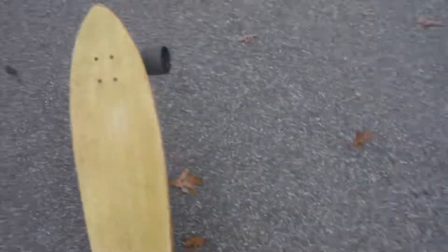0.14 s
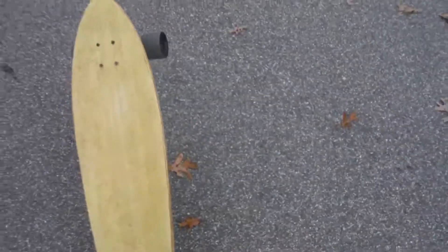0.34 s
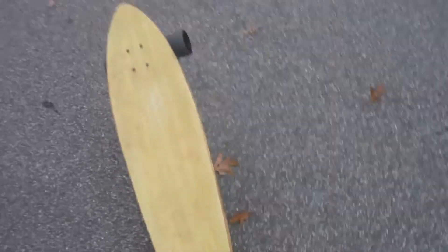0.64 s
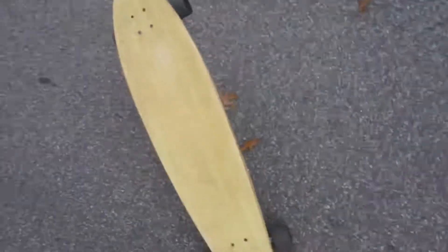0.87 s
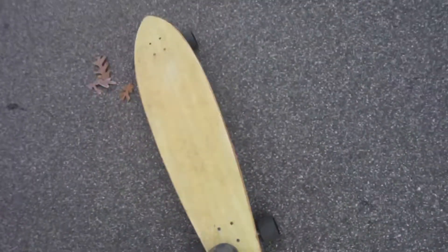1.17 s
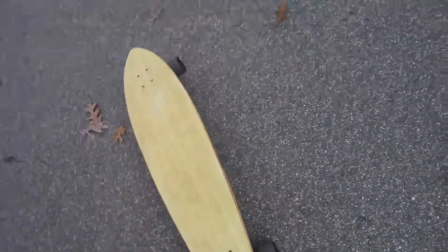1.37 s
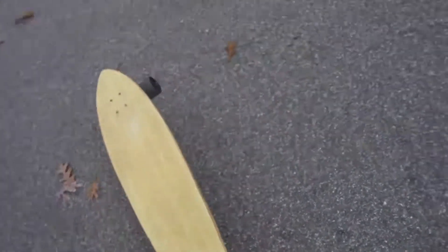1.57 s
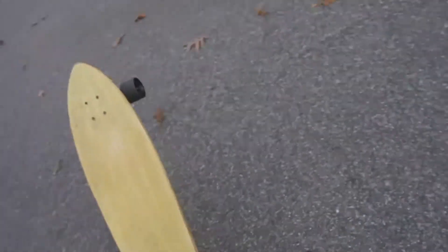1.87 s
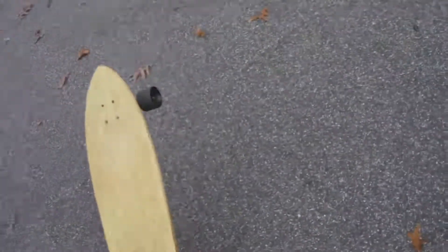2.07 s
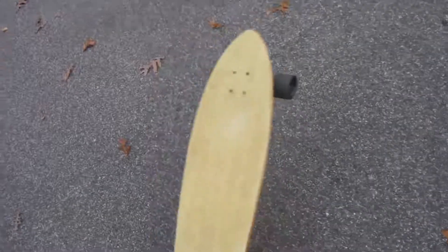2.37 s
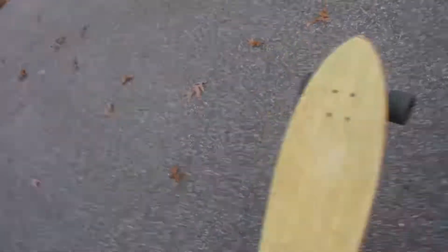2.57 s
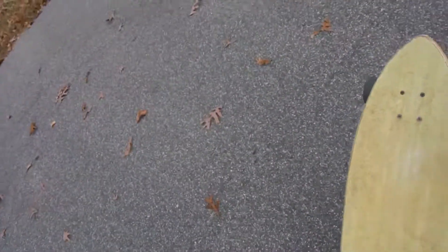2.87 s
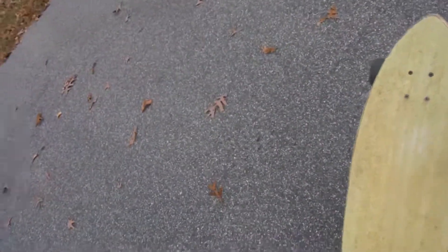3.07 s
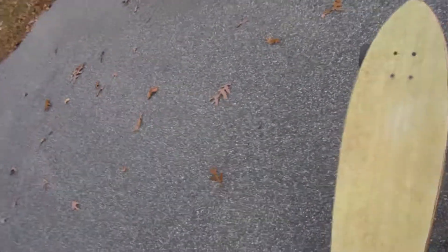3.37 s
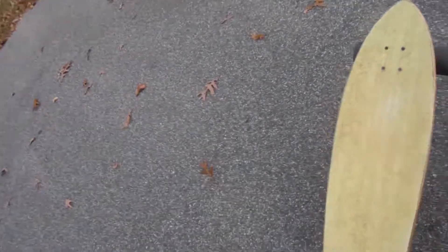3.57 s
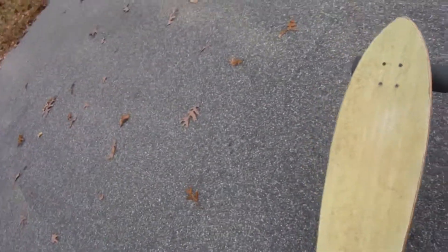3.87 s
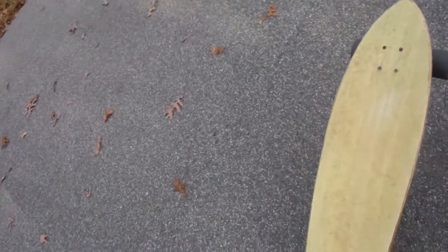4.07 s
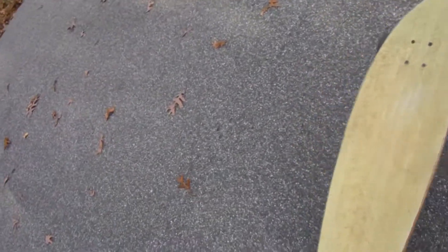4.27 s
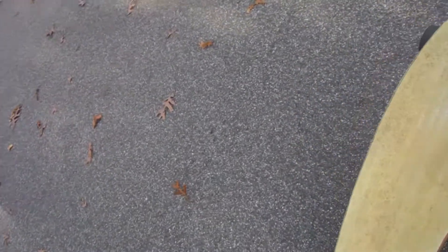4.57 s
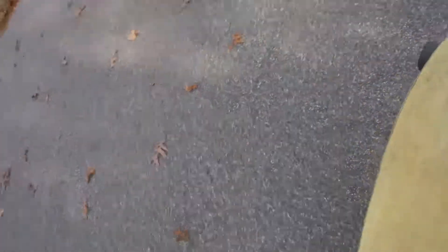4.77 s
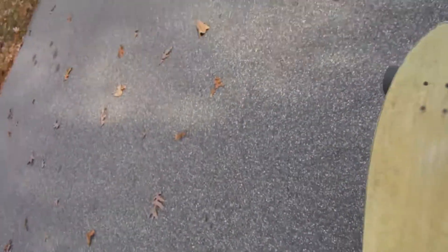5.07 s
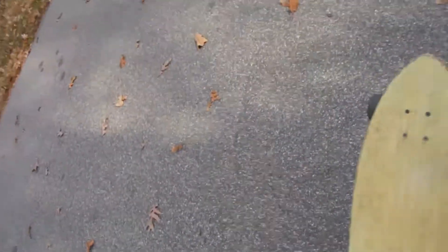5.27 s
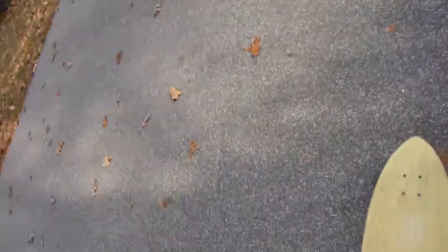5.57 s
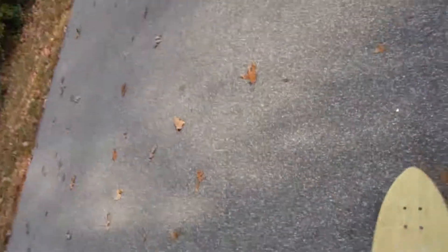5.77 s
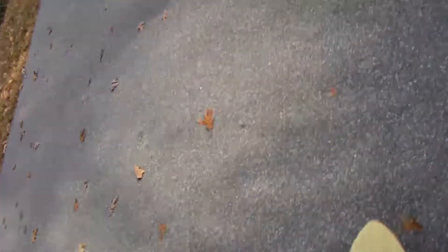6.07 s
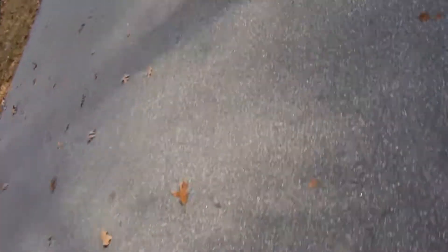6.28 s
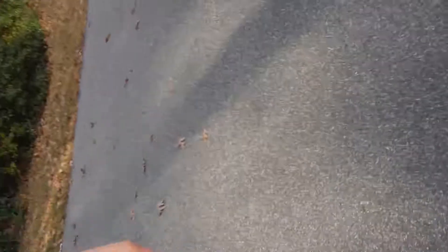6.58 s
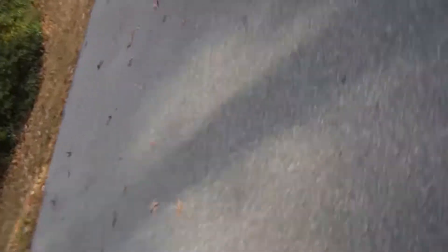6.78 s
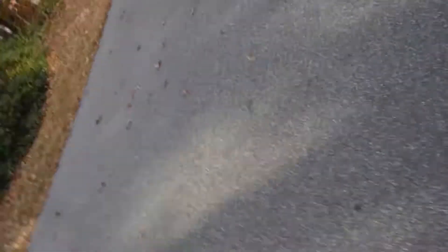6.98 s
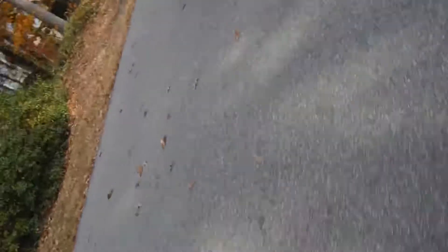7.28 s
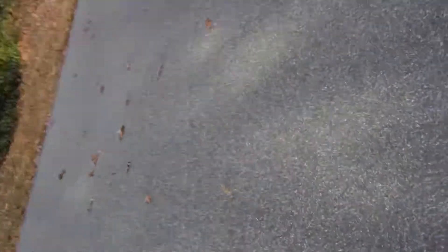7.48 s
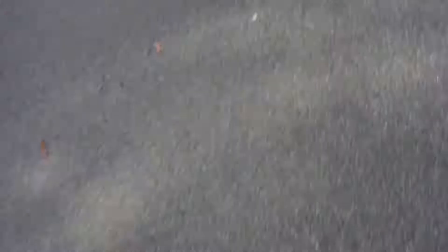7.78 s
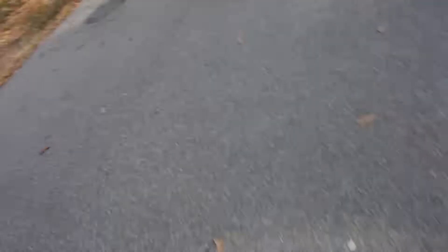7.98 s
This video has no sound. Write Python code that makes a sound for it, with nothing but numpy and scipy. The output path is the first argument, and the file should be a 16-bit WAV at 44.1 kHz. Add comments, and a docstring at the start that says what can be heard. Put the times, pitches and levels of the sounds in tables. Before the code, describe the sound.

A wooden longboard knocks and scrapes on asphalt, drops with a loud clack, then rolls away with a rising rumble.

```python
"""A wooden longboard is dropped, nudged and dragged on asphalt, then rolls away.
Each knock rings its deck (the wooden plank); stones make the wheels rumble, bearings and gravel hiss.
Shoes or sleeves scuff, small things tick, and fingers tap a hand-held camera whose lens motor chirps
over a quiet street. The loudest knocks overload the camera's sound and briefly turn its level down."""
import sys
import numpy as np
from scipy import signal
from scipy.io import wavfile
from scipy.ndimage import uniform_filter1d

SR = 44100
rng = np.random.default_rng(int(sys.argv[2]) if len(sys.argv) > 2 else 0)


def waveform_to_disk(signal):
    """Save audio, clipped to [-1, 1], as 16-bit WAV at the path in sys.argv[1]."""
    frames = np.transpose(np.atleast_2d(signal))
    scaled = np.clip(frames, -1, 1) * 32767
    samples = np.round(scaled).astype(np.int16)
    wavfile.write(sys.argv[1], SR, samples)


N = 358533

# The notes of the deck: (pitch [Hz], relative level [dB], time to fade 60 dB when nothing damps it [s])
DECK_NOTES = [(134, -15, 0.019), (179, -13, 0.044), (256.5, -8, 0.054), (327, -6, 0.017),
              (441, -5.5, 0.027), (487, -5, 0.074), (553, -7, 0.044), (621.8, -1.5, 0.14),
              (685, -5.5, 0.079), (734, -5, 0.056), (823, -2.5, 0.091), (924, -4, 0.065), (1040, -3, 0.05),
              (1160, -1.5, 0.023), (1390, -6, 0.041), (1608, -6.5, 0.041), (1920, 0, 0.022),
              (2210, -10, 0.036), (2428, -15, 0.022), (2900, -28, 0.028)]
# Tone of crushed grit, with the microphone's peak near 7.5 kHz: (frequency [Hz], relative level [dB])
GRIT_TONE = [(1290, -35.5), (2200, 4.5), (2370, -5.5), (2820, -1), (3620, -7), (3900, -4), (6160, -6),
             (7390, -2.5), (8510, -7.5), (10100, -20.5), (13000, -28.5), (16000, -47)]
# The board rolls: (time [s], rumble [dB], how strongly the deck rings [score], hiss against rumble [dB])
ROLL_PATH = [(6.06, -61, 8, 1), (6.09, -47.5, -9.5, -5), (6.26, -38.5, 11.5, 5), (6.42, -29.5, -7, -9.5),
             (6.42, -35, -2, -5.5), (6.55, -37, -11, -1.5), (6.68, -28.5, -2.5, -8),
             (6.84, -31, 10.5, -1.5), (6.95, -27, -2.5, -3.5), (7.07, -28, -7.5, -6.5),
             (7.26, -25.5, 5, -1.5), (7.3, -27.5, -1.5, -7.5), (7.33, -33, 12.5, 1.5),
             (7.38, -24.5, 3, -6.5), (7.39, -25.5, 4.5, 5), (7.43, -28, 0.5, -4), (7.49, -21, -7, -9),
             (7.67, -32, -9.5, -6.5), (7.85, -18, -7, -11), (7.88, -23, 3, -5), (8.02, -22, 5.5, -6.5),
             (8.05, -15.5, -8, -11.5), (8.08, -20.5, 1.5, -6.5), (8.13, -22.5, -4, -8.5)]


def gain_of(db):
    """Turns decibels into a number to multiply by."""
    return 10 ** (np.asarray(db) / 20)


def evened(x):
    """Scales a signal to an average power of 1."""
    return x / np.sqrt(np.mean(x ** 2) + 1e-20)


def add(mix, start, sound):
    """Mixes a sound in at a time in seconds."""
    part = mix[max(round(start * SR), 0):][:len(sound)]
    part += sound[:len(part)]


def coloured(x, tone):
    """Filters a sound to a tone curve of (Hz, dB) points; the result has power 1."""
    points_hz, db = np.transpose(tone)
    hz = abs(np.fft.fftfreq(8192, 1 / SR))
    log_gain = np.interp(np.log(hz + 1), np.log(points_hz + 1), np.maximum(db, -100)) * np.log(10) / 20
    response = np.exp(np.conj(signal.hilbert(log_gain)))  # rings after a hit, never before it
    impulse = np.fft.ifft(response).real[:4096]
    return evened(signal.oaconvolve(x, impulse)[:len(x)])


def curve(times, db):
    """A gain that glides through levels at given times and is silent outside them."""
    return gain_of(np.interp(np.arange(N) / SR, times, db, -200, -200))


def strokes(rows, rise_s, fall_db_per_s):
    """A gain made of strokes (start, hold, dB) that each rise, hold and die away."""
    out = np.zeros(N)
    for start, hold, db in rows:
        t = np.arange(0, hold + 60 / fall_db_per_s, 1 / SR)
        fading = gain_of(db - fall_db_per_s * np.maximum(t - hold, 0))
        add(out, start, np.minimum(t / rise_s, 1) * fading)
    return out


def ring(notes, length, shares):
    """A struck object's fading notes (t60: seconds to fade 60 dB); shares vary their size and sign."""
    t = np.arange(round(length * SR)) / SR
    parts = (np.sign(share) * gain_of(db - 60 * t / t60) * (0.77 + abs(share)) * np.sin(2 * np.pi * hz * t)
             for (hz, db, t60), share in zip(notes, shares))
    return sum(parts) * (1 - np.exp(-t / 0.0001))


def resonate(x, hz, width_hz):
    """Keeps the part of a sound near one pitch, which may move; the result has power 1."""
    turn = np.exp(2j * np.pi * np.cumsum(hz * np.ones(len(x))) / SR)
    decay = np.exp(-np.pi * width_hz / SR)
    smoothed = signal.lfilter([1], np.convolve([1, -decay], [1, -decay]), x / turn)
    return evened((turn * smoothed).real)


def wavering(hz, width_hz):
    """A tone whose pitch and level wander at random; it has power 1."""
    decay = np.exp(-np.pi * width_hz / SR)
    drift = signal.lfilter([1 - decay], [1, -decay], rng.standard_normal(N) + 1j * rng.standard_normal(N))
    return evened((drift * np.exp(2j * np.pi * hz * np.arange(N) / SR)).real)


def bumps(per_s, spread_db):
    """Tiny kicks at random times, like stones in asphalt; a few are large."""
    size = gain_of(spread_db * np.minimum(rng.exponential(1, N), 4)) * rng.choice([-1., 1.], N)
    return size * (rng.random(N) < per_s / SR)


def shaking(per_s, spread_db, t60, rise_s):
    """A restless gain: each jolt of the axles sets off a short swell."""
    jolts = abs(bumps(per_s, spread_db))
    fall, rise = gain_of(-60 / (t60 * SR)), np.exp(-1 / (rise_s * SR))
    swells = signal.lfilter([1], np.convolve([1, -fall], [1, -rise]), jolts)
    return evened(0.96 + evened(swells))


def street():
    """A distant wash of noise with drifting patches, two hums and a thin whine that comes and goes."""
    # Tone of the wash: (frequency [Hz], relative level [dB])
    wash_tone = [(13, -67), (22, -13.5), (101, -5.5), (157, -17.5), (232, -16), (450, -20), (926, -17.5),
                 (1290, -22), (2250, -21), (2730, -23), (4880, -23.5), (5300, -26), (6200, -28),
                 (7800, -25.5), (10500, -38), (15200, -43), (16500, -21.5)]
    # Hums that never stop: (pitch [Hz], width of the wavering [Hz], level [dB])
    hum_notes = [(114, 29, -46), (2110, 1.6, -62.5)]
    # Loudness of the whine: (time [s], level [dB])
    whine_levels = [(.75, -57), (.9, -57), (1.54, -66), (1.57, -50), (1.7, -52), (1.74, -59), (3.12, -58),
                    (3.17, -53), (3.28, -52), (3.33, -66), (3.56, -63), (3.62, -51), (3.92, -56),
                    (4.0, -60), (4.6, -60), (5.5, -70)]
    _, _, spectrum = signal.stft(coloured(rng.standard_normal(N), wash_tone), nperseg=1024)
    speckle = rng.standard_normal(spectrum.shape)
    patches = evened(uniform_filter1d(uniform_filter1d(speckle, 14, 0), 8, 1))  # blur in pitch and time
    wash = evened(signal.istft(spectrum * gain_of(0.62 * patches), nperseg=1024)[1][:N])
    hums = sum(gain_of(db) * wavering(hz, width) for hz, width, db in hum_notes)
    whine = curve(*np.transpose(whine_levels)) * wavering(2313, width_hz=15)
    return gain_of(-40.5) * wash + hums + whine


def tick(hz, width_hz, t60, snap_db):
    """One tiny burst of noise around a pitch, with a bright snap at the microphone's peak."""
    t = np.arange(round(.04 * SR)) / SR
    burst = rng.standard_normal(len(t)) * gain_of(-60 * t / t60) * (1 - np.exp(-t / 0.00025))
    sound = resonate(burst, hz, width_hz) + gain_of(snap_db) * resonate(burst, 7600, width_hz=2200)
    sound = signal.sosfilt(signal.butter(2, [150, 10500], 'band', fs=SR, output='sos'), sound)
    return sound / abs(sound).max()


def camera_taps():
    """Fingers tap the camera body with dull little knocks."""
    # Taps: (time [s], peak level [dB], centre pitch [Hz])
    taps = [(.015, -13.5, 155), (.354, -29.5, 151), (0.471, -27.5, 194), (.697, -19.5, 700),
            (6.107, -22, 458)]
    out = np.zeros(N)
    for start, db, hz in taps:
        add(out, start, gain_of(db) * tick(hz, width_hz=940, t60=0.0065, snap_db=-21))
    return out


def dry_ticks():
    """Pebbles, leaves and fingers make short, dry ticks."""
    # Ticks: (time [s], peak level [dB], centre pitch [Hz], snap against the tick's body [dB])
    ticks = [(.0553, -18.5, 1460, -9), (0.0666, -17.5, 4500, -1), (0.207, 3.5, 3180, -5.5),
             (0.26, -9.5, 4450, -9), (.4753, -20, 4150, 3), (.5684, -23, 4500, 3), (6.349, 0, 3780, -12),
             (6.404, -7, 1560, -16), (6.427, -5, 3170, -22), (6.459, -27, 1800, -16),
             (6.6255, -22, 2310, -14), (6.757, -11.5, 1910, 2), (6.8052, -13.5, 1480, -7),
             (6.988, -3.5, 1680, -12), (7.0411, -10, 3020, -20), (7.105, -10.5, 1940, -24),
             (7.2065, -16, 1500, -3), (7.2683, -6.5, 1630, -5), (7.3194, -12, 1760, -12),
             (7.388, -7, 5820, -10), (7.5501, -7, 2980, -17), (7.558, -12.5, 3540, -21),
             (7.7114, -20.5, 3050, -6), (7.742, -1, 1900, -15), (7.9744, -7, 1360, -17)]
    out = np.zeros(N)
    for start, db, hz, snap_db in ticks:
        add(out, start, gain_of(db) * tick(hz, width_hz=2660, t60=0.0071, snap_db=snap_db))
    return out


def scuffs():
    """A shoe or sleeve rubs briefly and makes a grainy noise."""
    # Rubs: (start [s], hold [s], level [dB])
    rubs = [(0.058, 0.013, -36.5), (.468, 0.022, -30.5), (6.034, 0.013, -28)]
    # Tone of the rubbing: (frequency [Hz], relative level [dB])
    rub_tone = [(120, -47), (200, 0), (1570, -0.5), (1880, -2.5), (3120, 1), (5550, -1), (7020, 5),
                (8570, -0.5), (11900, -33), (15000, -29)]
    friction = rng.standard_normal(N) + .5 * evened(bumps(per_s=640, spread_db=2))
    return coloured(friction, rub_tone) * strokes(rubs, rise_s=0.0048, fall_db_per_s=830)


def lens_motor():
    """A small motor whistles in steps; its gear clicks at its stops and when it starts after a rest."""
    # The motor runs: (start [s], length [s])
    runs = [(0.458, .008), (.498, .022), (1.08, 0.048), (1.371, .008), (1.496, 0.055), (1.97, 0.037),
            (2.062, .01), (2.08, .01), (2.126, .01), (2.192, .01), (2.216, .01), (2.257, .01), (2.29, .039),
            (2.727, .01), (2.98, .01), (3.043, 0.012), (3.082, .012), (3.12, .012), (3.145, 0.023),
            (3.254, 0.032), (3.323, 0.018), (3.366, .01), (3.395, .008), (3.418, .052), (3.538, .01),
            (3.568, 0.012), (3.601, 0.011), (3.633, .01), (3.683, .01), (3.711, 0.011), (3.778, .034),
            (4.124, .012), (4.146, .01), (4.231, 0.0093), (4.253, 0.013), (4.334, .01), (4.387, 0.011),
            (4.428, .012), (4.5, 0.01), (4.529, .02), (4.628, 0.08), (4.858, 0.023), (5.115, .011),
            (5.147, 0.01), (5.194, .01), (5.226, .01), (5.295, .03), (5.337, .01), (5.403, .012),
            (5.46, .012)]
    # The gear hits a stop: (time [s], peak level [dB])
    stops = [(.4229, -30.5), (.5322, -23), (1.0507, -23), (1.061, -27), (1.1525, -23), (1.3129, -28),
             (1.5892, -21.5), (2.3347, -22), (2.7502, -22), (3.162, -25), (3.8217, -27), (4.0628, -26.5),
             (4.7496, -22), (5.043, -27)]
    # The notes of the gear: (pitch [Hz], relative level [dB], time to fade 60 dB [s])
    gear_notes = [(3740, -1.5, 0.011), (5120, 4.5, 0.0082), (6540, -8.5, 0.0079), (7440, -2.5, 0.0064)]
    motor_hz, steps_per_s, motor_db = 5275, 78, -40.5
    rest_s, restart_db = .02, -33
    out = np.zeros(N)
    for start, length in runs:
        t = np.arange(round(length * SR)) / SR
        throb = abs(np.sin(np.pi * steps_per_s * t)) + 0.1
        whistle = signal.windows.tukey(len(t), .3) * np.sin(2 * np.pi * motor_hz * t)
        add(out, start, gain_of(motor_db) * throb * whistle)
    restarts = [(start, restart_db) for (start, _), (previous, length) in zip(runs[1:], runs)
                if start - previous - length > rest_s]
    for start, db in stops + restarts:
        click = ring(gear_notes, .02, rng.standard_normal(len(gear_notes)))
        add(out, start, gain_of(db) * click / abs(click).max())
    return out


def deck_knocks():
    """The board falls or is knocked: one hit and a chatter of smaller ones ring the wood and crack."""
    # Knocks: (time [s], level [dB], crack against the knock [dB], chatter length [s],
    # hardness [dB per octave above the main note])
    knocks = [(1.179, 6.5, -14.5, 0.025, 0.5), (1.268, -19, -10, .008, 0), (1.28, -17, -12, .008, 6),
              (1.844, -16, 1, .018, 3), (1.891, -23, -12, 0.034, -4), (2.544, -16, -7, 0.013, -3),
              (2.572, -18.5, -12, 0.011, -2), (2.589, -25, -15, 0.018, -1.5), (2.621, -17, -12, 0.015, -1),
              (2.66, -1.5, -6.5, 0.0042, 3.5), (2.669, -7, -9, .012, -1), (2.714, -22.5, -14, .015, -8),
              (2.8, -18.5, -19, 0.013, -7), (2.824, -16, -18, 0.016, 0), (2.838, -16, -17, 0.012, 1),
              (2.862, -19, -20, .021, 3), (2.904, -17, -14, 0.019, -1), (2.927, -9, -13.5, 0.015, -1),
              (3.018, -25, -11, 0.0072, -7), (3.047, -16.5, -18, .012, -5), (3.103, -10, -14, 0.0087, -6),
              (3.114, -12, -14.5, 0.0093, -1.5), (3.283, -21.5, -17, .013, 1),
              (3.311, -17, -23, 0.019, 3.5), (4.803, -22, -16.5, 0.018, -4.5), (4.846, -27, -14, .012, 5),
              (4.859, -16, -19.5, 0.015, 1), (4.894, -10, -21.5, 0.024, -3), (5.048, -27.5, -27, 0.015, -6),
              (5.091, -18, -14, 0.016, 2), (5.122, -21.5, -12.5, 0.014, -3), (5.303, -20.5, -10, .005, 3),
              (5.311, -15, -11.5, 0.011, 1.5), (5.326, -17.5, -17, 0.02, 2.5), (5.392, -24.5, -20, .012, 0),
              (5.465, -28, -13, 0.012, 2), (5.494, 14.5, -20, .045, -2), (7.337, -6.5, -19, 0.0081, 1),
              (7.827, -16.5, -14, 0.026, 3), (7.896, -12, -10.5, .018, 2), (7.969, -6, -11.5, 0.013, 0.5)]
    main_hz, chatter_per_s, chatter_db = 617, 900, -8.5
    held = 0.65  # hand and foot leave this share of the ring time
    t = np.arange(round(.07 * SR)) / SR
    shape = (len(knocks), len(t))
    note_shares = rng.standard_normal((len(knocks), len(DECK_NOTES)))
    chatters = rng.standard_normal(shape) * (rng.random(shape) < chatter_per_s / SR)
    ringing, cracks = np.zeros(N), np.zeros(N)
    for (start, db, crack_db, length, hardness), shares, chatter in zip(knocks, note_shares, chatters):
        touching = np.clip((length - t) / 0.0015, 0, 1)
        force = gain_of(chatter_db) * chatter * touching
        force[0] = 1  # the first hit
        notes = [(hz, level + hardness * max(np.log2(hz / main_hz), 0), t60 * held)
                 for hz, level, t60 in DECK_NOTES]
        wood = ring(notes, .25, shares)
        add(ringing, start, gain_of(db) * signal.oaconvolve(force, wood / abs(wood).max()))
        burst = uniform_filter1d(abs(force), 60, origin=-29) * 60 + 0.16 * touching
        add(cracks, start, gain_of(db + crack_db) * burst * rng.standard_normal(len(t)))
    return ringing + coloured(cracks, GRIT_TONE) * np.sqrt(np.mean(cracks ** 2))


def wheel_drags(stones, deck, crunch):
    """Wheels scrape the ground or judder after a fall: the deck rings and grit crunches."""
    # Drags: (start [s], hold [s], deck level [dB], grit against the deck [dB])
    drags = [(1.207, .006, -5, -12.5), (1.308, 0.014, -34.5, -23), (1.844, 0.013, -24, 4.5),
             (1.891, .055, -27, -2.5), (2.542, .11, -25.5, -7.5), (2.674, 0.026, -26.5, -7),
             (2.801, .15, -28.5, -9), (3.015, .12, -31.5, -11.5), (3.279, 0.054, -34.5, -12),
             (3.381, 0.025, -40, -8), (4.803, 0.14, -33.5, -14), (5.047, 0.11, -38.5, -17),
             (5.254, 0.028, -36, -10), (5.312, 0.033, -37, -12), (5.361, 0.072, -39, -13),
             (5.46, 0.023, -41, -9), (5.526, 0.0073, -13.5, -4.5), (5.586, 0.1, -40.5, -7)]
    rise_s, fall_db_per_s = 0.0026, 343
    grit = coloured(crunch * rng.standard_normal(N) + 0.79 * stones, GRIT_TONE)
    deck_rows = [(start, hold, db) for start, hold, db, _ in drags]
    grit_rows = [(start, hold, db + grit_db) for start, hold, db, grit_db in drags]
    wood = deck * strokes(deck_rows, rise_s, fall_db_per_s)
    return wood + grit * strokes(grit_rows, rise_s, fall_db_per_s)


def wheel_hiss(stones, crunch):
    """Bearings and gravel hiss while the wheels turn, and jolts rattle the bearings."""
    # A nudged wheel spins and slows: (start [s], hold [s], level [dB])
    spins = [(1.93, .03, -45), (5.305, 0.15, -45), (5.55, .01, -35.5)]
    # Jolts: (time [s], level [dB])
    rattles = [(6.223, -26), (6.306, -34), (6.427, -29), (6.652, -26), (6.701, -30), (6.79, -19.5),
               (6.828, -25), (6.864, -25), (6.887, -21.5), (6.987, -20.5), (7.231, -21), (7.335, -25),
               (7.365, -26), (7.388, -13), (7.465, -27), (7.813, -25), (7.827, -19), (7.858, -19),
               (7.899, -17), (7.971, -16.5), (8.004, -26), (8.048, -16), (8.079, -22), (8.104, -21.5)]
    # Tone of the bearings: (frequency [Hz], relative level [dB])
    bearing_tone = [(3000, -37), (5200, -5.5), (6070, -6.5), (7060, 2.5), (7710, 2.5), (9130, -9),
                    (10800, -15), (11900, -24.5), (14000, -33), (16500, -53)]
    # Tone of the gravel: (frequency [Hz], relative level [dB])
    gravel_tone = [(1200, -6), (2300, 1.5), (3500, -4.5), (5000, -4), (6200, -6.5), (9000, -39)]
    rattle_t60, gravel_db = 0.039, -3
    times, rumble_db, _, hiss_db = np.transpose(ROLL_PATH)
    turning = curve(times, rumble_db + hiss_db) + strokes(spins, rise_s=.004, fall_db_per_s=103)
    rattling = turning * shaking(per_s=55, spread_db=1.5, t60=0.023, rise_s=0.001) ** 0.73
    t = np.arange(round(.1 * SR)) / SR
    for start, db in rattles:
        add(rattling, start, gain_of(db - 60 * t / rattle_t60) * (1 - np.exp(-t / 0.00026)))
    bearings = rattling * coloured(rng.standard_normal(N), bearing_tone)
    gravel = coloured(crunch ** 0.83 * rng.standard_normal(N) + 0.41 * stones, gravel_tone)
    return bearings + gravel * turning * gain_of(gravel_db)


def rolling(stones, deck):
    """The road shakes wheels and deck; the air under the board rises and swells with the deck's ring."""
    # Tone of the wheels and axles: (frequency [Hz], relative level [dB])
    rumble_tone = [(18, -33), (35, -6), (64, -11), (95, -18), (130, 5.5), (210, 7.5), (300, 7.5),
                   (450, 4.5), (624, 1), (920, -6), (1400, -12), (2500, -17.5), (4000, -63)]
    times, rumble_db, ring_score, _ = np.transpose(ROLL_PATH)
    roughness = shaking(per_s=30, spread_db=4.5, t60=0.25, rise_s=0.0032) ** 0.79
    road = roughness * rng.standard_normal(N) + 0.43 * stones
    rumble = coloured(road, rumble_tone) * curve(times, rumble_db)
    wood = deck * curve(times, rumble_db - 2.5 + 1.42 * ring_score)
    air_hz = np.minimum(509 * 2 ** (0.13 * ring_score), 820)
    air = resonate(road, np.interp(np.arange(N) / SR, times, air_hz), width_hz=210)
    return rumble + wood + air * curve(times, rumble_db - 5.5 + ring_score)


def wheels():
    """Stones knock through the axles into the deck; the same stones drive drags, hiss and rolling."""
    stones = evened(bumps(per_s=1100, spread_db=4))
    damped = [(hz, db, t60 * 0.43) for hz, db, t60 in DECK_NOTES]  # wheels on the ground damp the wood
    one_knock = ring(damped, .15, shares=np.cos(np.arange(len(damped)) ** 2))
    deck = evened(signal.oaconvolve(stones, one_knock)[:N])
    crunch = shaking(per_s=60, spread_db=4.5, t60=0.023, rise_s=0.00095)
    return wheel_drags(stones, deck, crunch) + wheel_hiss(stones, crunch) + rolling(stones, deck)


def scene():
    """All the sounds in one channel, close by and in the open air."""
    return (deck_knocks() + dry_ticks() + camera_taps() + wheels() + scuffs() + lens_motor() + street())[None]


def record(dry):
    """The camera turns loud sounds down, clips their peaks, adds a faint whine and cuts the top treble."""
    threshold_db, clip_level, top_hz = -16, 0.64, 15900
    power_db = 10 * np.log10(abs(uniform_filter1d(dry[0] ** 2, 400)) + 1e-12)
    recovery = np.arange(N) * 66 / SR
    held_db = np.maximum.accumulate(np.minimum(power_db, 0) + recovery) - recovery  # peaks fade slowly
    over_db = np.maximum(held_db - threshold_db, 0)
    late_db = signal.lfilter([.0008], [1, .0008 - 1], over_db)  # takes about 30 ms to react
    clipped = np.clip(dry / gain_of(.5 * late_db), -clip_level, clip_level)
    centred = signal.sosfilt(signal.butter(1, 9, 'high', fs=SR, output='sos'), clipped)
    electronics = gain_of(-65) * wavering(15735, width_hz=8)
    treble_cut = signal.firwin(511, top_hz, window=("kaiser", 9), fs=SR)
    return signal.oaconvolve(centred + electronics, treble_cut[None], "same")


dry = scene()
out = record(dry)
waveform_to_disk(out)
```